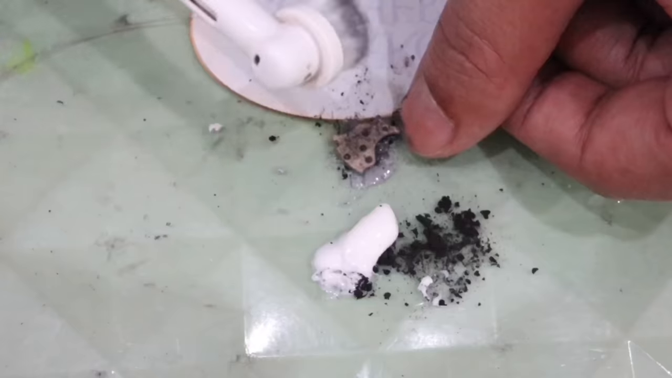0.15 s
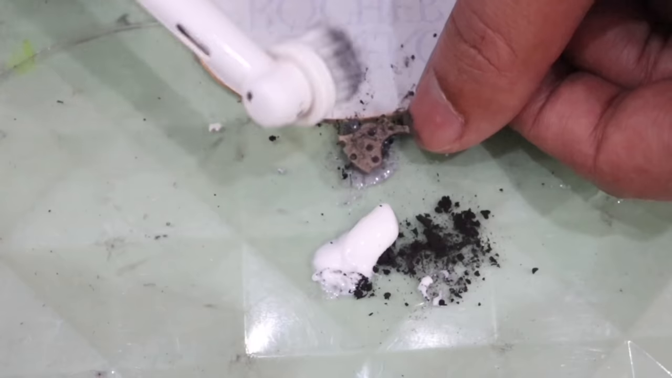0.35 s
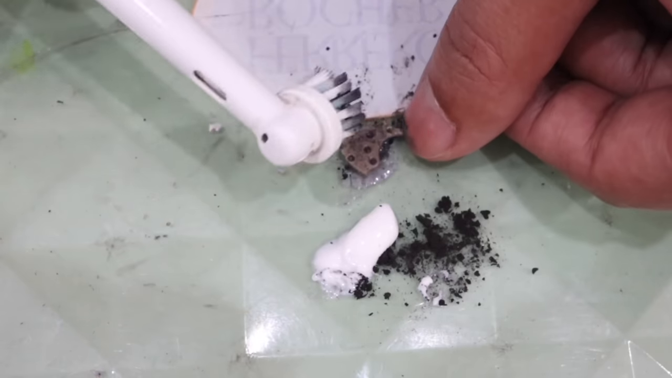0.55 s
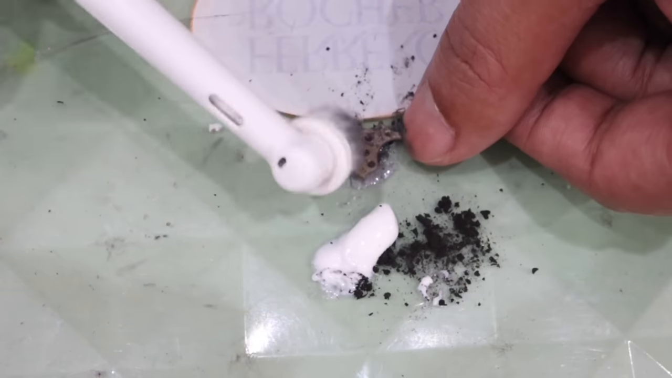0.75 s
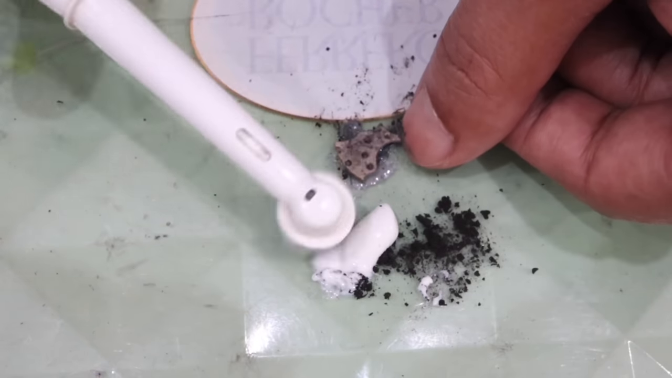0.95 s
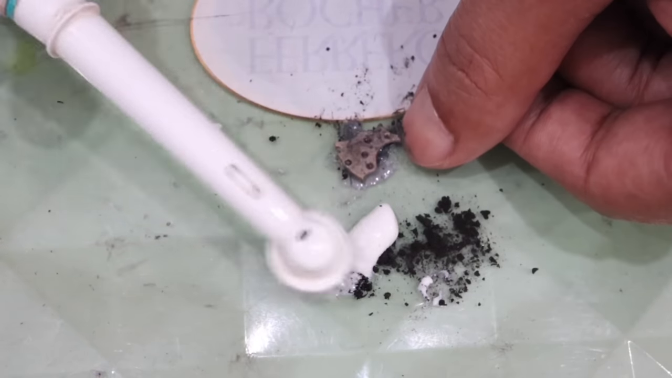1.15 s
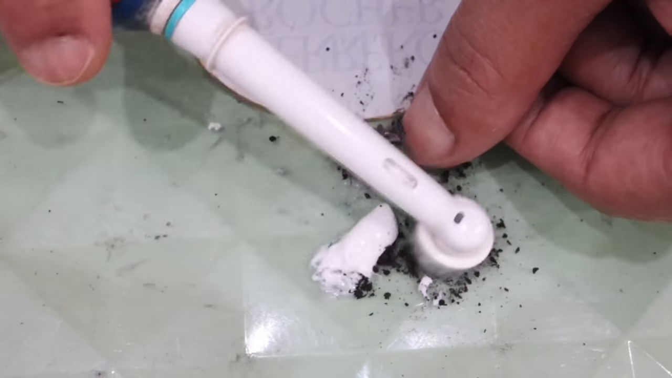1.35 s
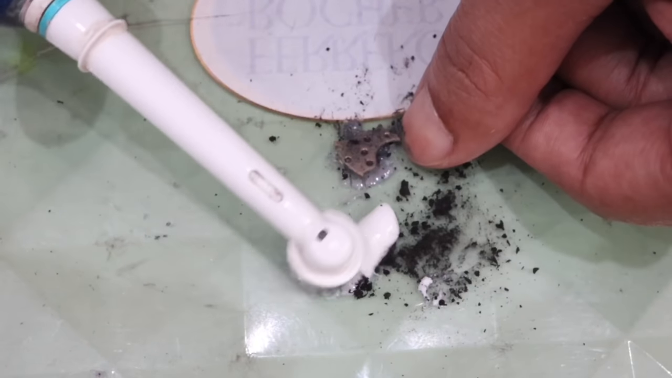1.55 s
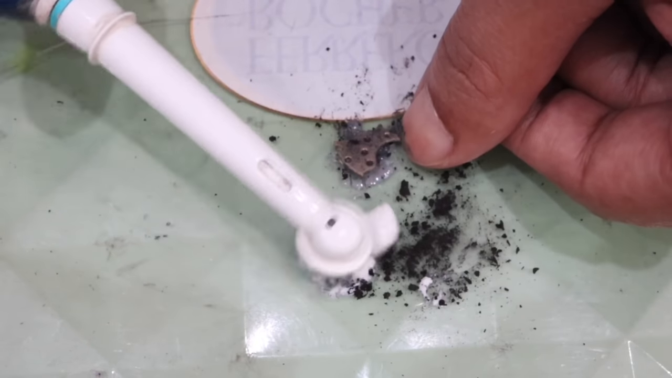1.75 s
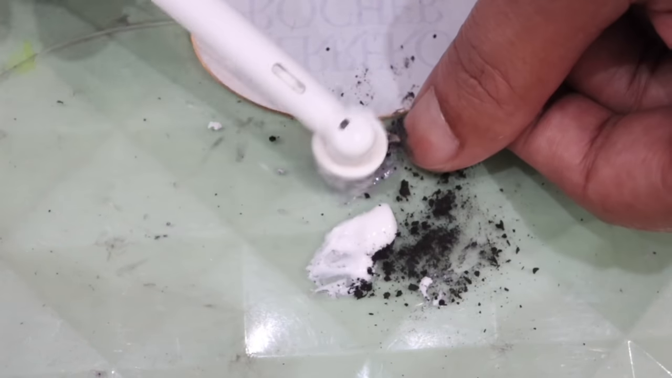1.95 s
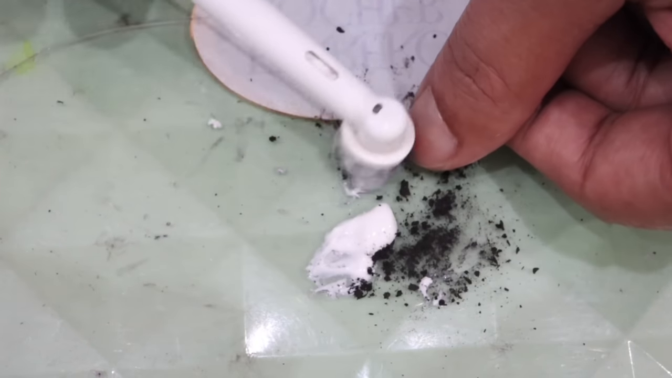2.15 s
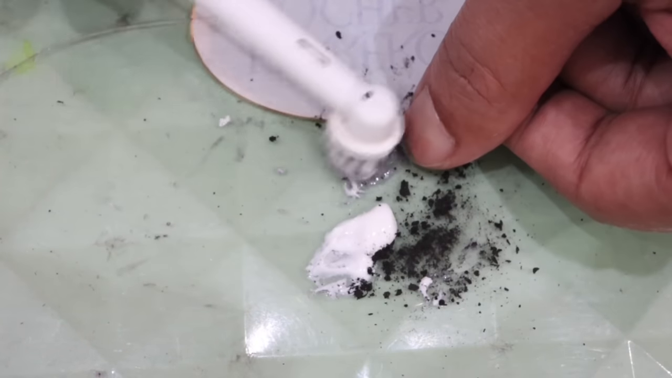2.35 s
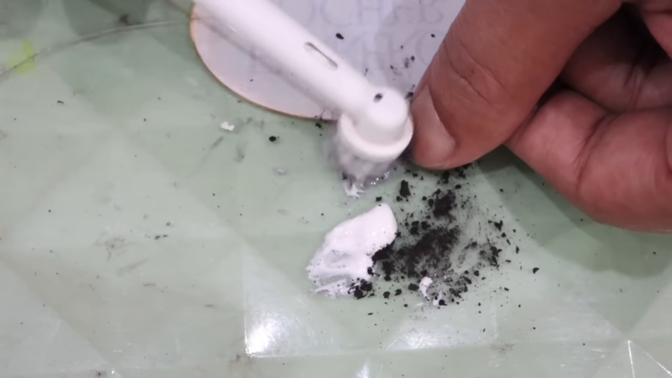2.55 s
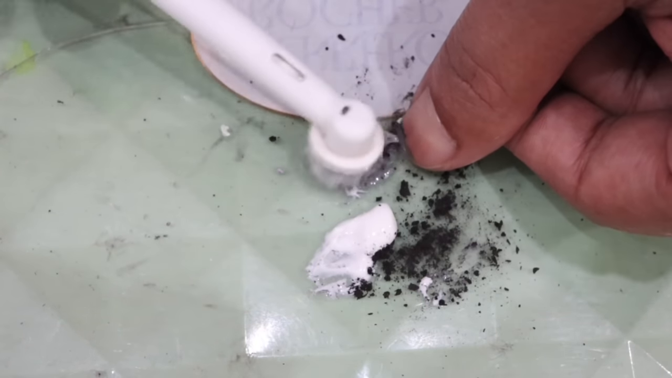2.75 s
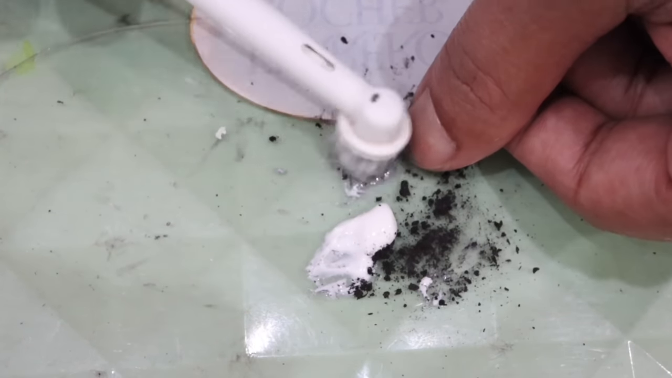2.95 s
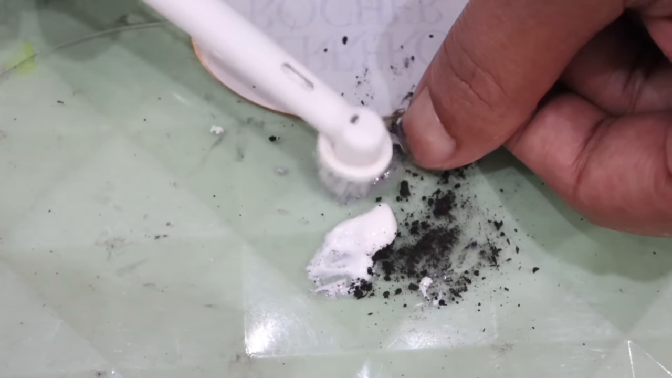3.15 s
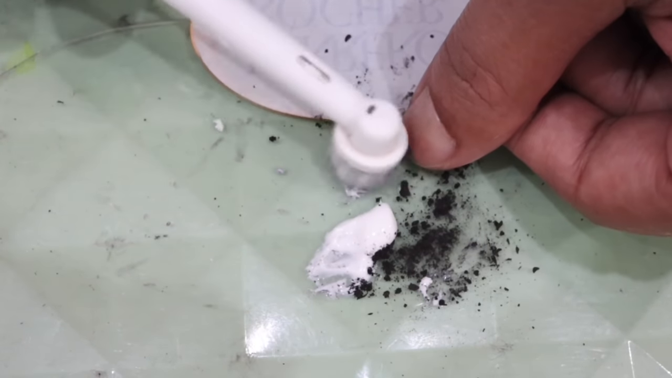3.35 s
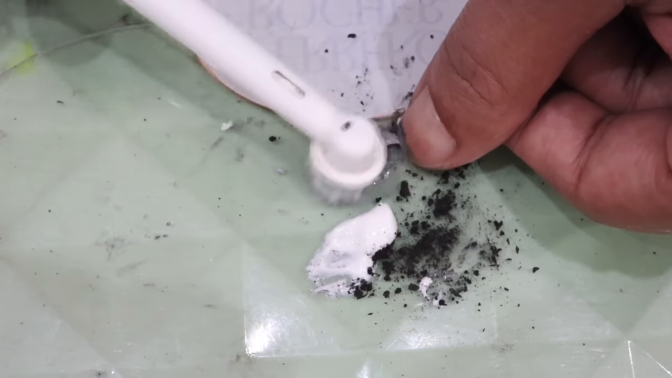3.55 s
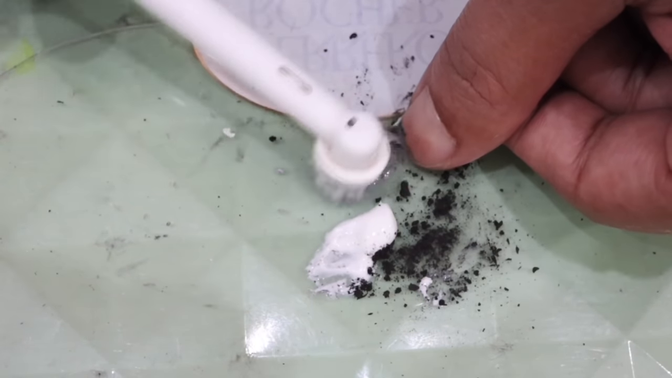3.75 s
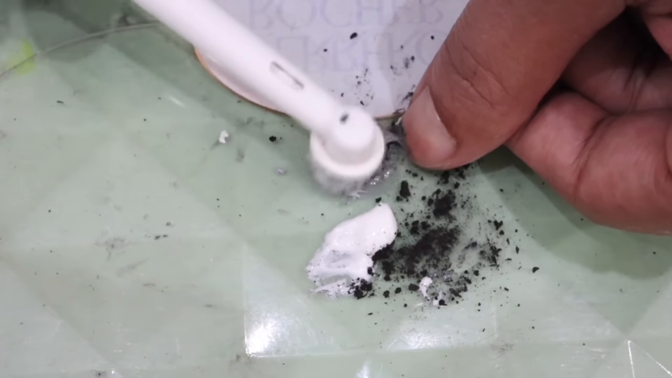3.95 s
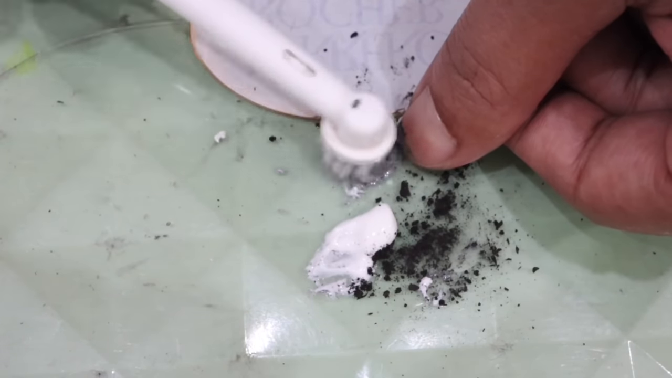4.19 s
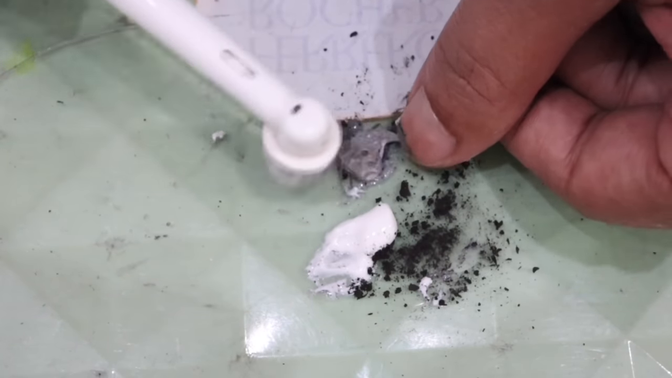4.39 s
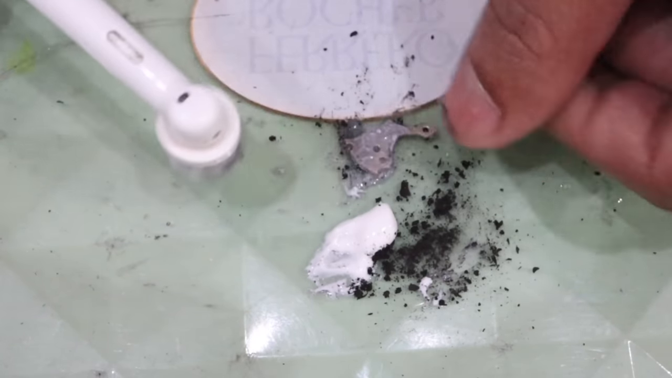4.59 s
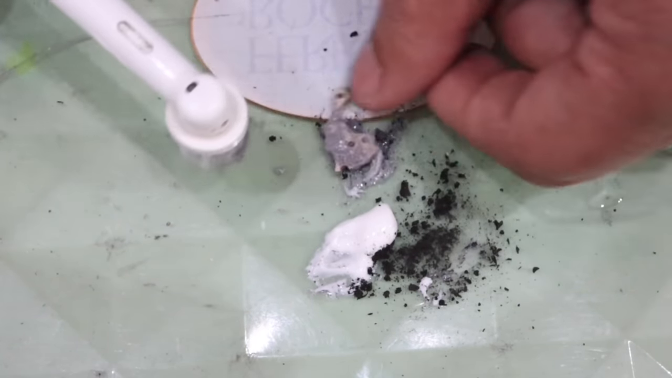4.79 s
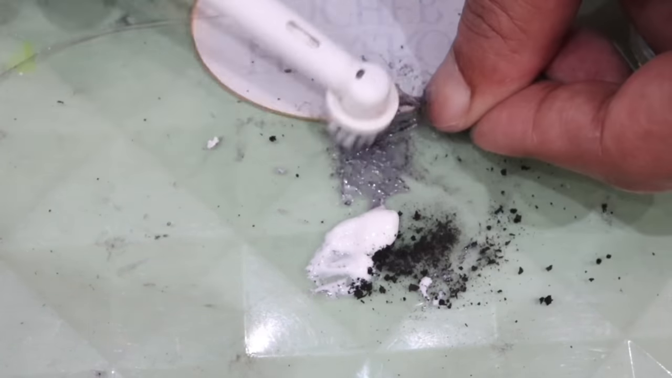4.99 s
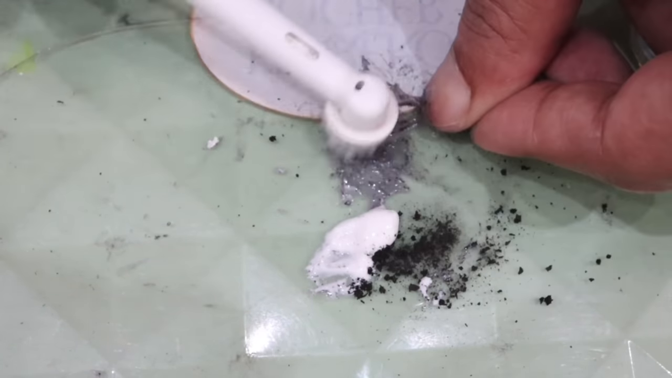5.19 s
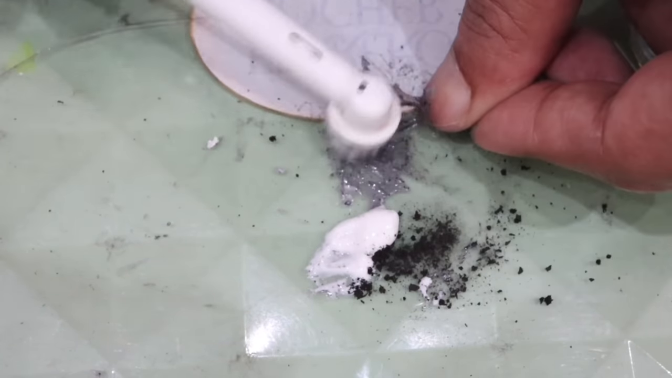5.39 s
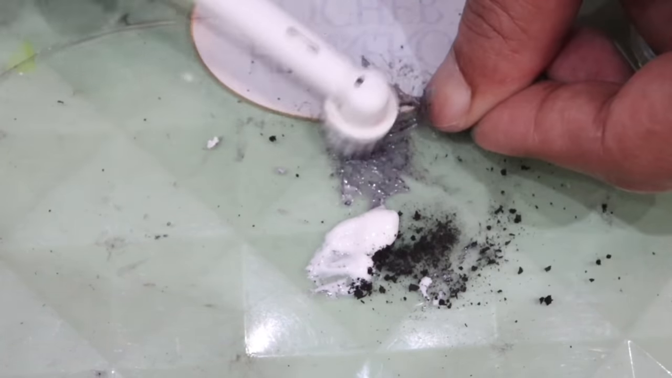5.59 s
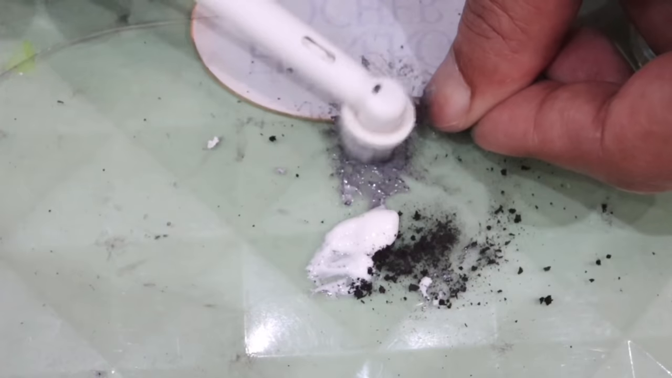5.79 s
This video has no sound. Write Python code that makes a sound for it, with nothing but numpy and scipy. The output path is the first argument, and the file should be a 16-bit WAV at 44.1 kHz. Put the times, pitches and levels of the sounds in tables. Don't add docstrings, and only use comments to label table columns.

```python
import sys
import numpy as np
from scipy import signal
from scipy.io import wavfile
from scipy.ndimage import uniform_filter1d

SR = 44100
rng = np.random.default_rng(int(sys.argv[2]) if len(sys.argv) > 2 else 0)


def persist_wave(psi):
    counts = np.round(np.clip(psi, -1, 1) * 32767).astype(np.int16)
    wavfile.write(sys.argv[1], SR, np.atleast_2d(counts).T)


def gain_from_db(level_db):
    decades = np.asarray(level_db, float) / 20
    return 10 ** decades


N = 257103
T = np.arange(N) / SR
TEETH = 4.537
FREE_WHINE_DB = -71.5

# (start [s], end [s], peak hiss [dB], share of the stroke before its peak [1], spectral
# tilt, high = dull, low = bright [dB])
STROKE_EVENTS = [(0.561, 0.643, -55, 0.7, -3.5), (0.683, 0.766, -55, 0.24, -7),
                 (1.263, 1.284, -55, .1, 5.5), (1.289, 1.367, -60, .1, 3), (2.235, 2.358, -48.5, .4, 0.5),
                 (2.623, 2.69, -50.5, .1, -1.5), (2.691, 2.781, -41.5, 0.56, -14),
                 (2.778, 2.878, -43.5, 0.44, -11.5), (2.881, 2.971, -45.5, 0.38, -8.5),
                 (3.267, 3.339, -41.5, 0.48, -8.5), (3.483, 3.614, -53, 0.77, 1.5),
                 (3.63, 3.765, -52, 0.55, -1), (3.837, 3.96, -55.5, .2, 0.5),
                 (4.557, 4.615, -56, 0.41, -15), (4.654, 4.693, -48, .6, -4),
                 (4.802, 4.86, -49, 0.018, -4.5), (4.904, 5.063, -41.5, 0.046, -7.5),
                 (5.064, 5.097, -42, 0.66, -10), (5.133, 5.213, -44, 0.51, -11.5),
                 (5.254, 5.32, -41.5, 0.39, -5.5), (5.374, 5.412, -41, .3, -10),
                 (5.504, 5.554, -48, 0.064, -9), (5.605, 5.697, -42, .55, -8), (5.735, 5.82, -45, 0.65, -5)]


def evened(x):
    return x / np.sqrt(np.mean(x ** 2) + 1e-20)


def curve(rows, order):
    rows = np.vstack(rows)
    return np.interp(T, rows[:, 0], rows[:, order])


def coloured(x, points):
    f, db = np.transpose(points)
    hz = abs(np.fft.fftfreq(8192, 1 / SR))
    gain_db = np.interp(np.log(hz + 1), np.log(f + 1), db)
    log_gain = np.log(gain_from_db(np.maximum(gain_db, -100)))
    taps = np.fft.ifft(np.exp(np.conj(signal.hilbert(log_gain)))).real[:4096]
    return signal.oaconvolve(x, taps)[:len(x)]


def resonate(x, hz, width):
    pole = np.exp((2j * hz - width) * np.pi / SR)
    return 2 * signal.lfilter([1 - abs(pole)], [1, -pole], x).real


def band(x, low_hz, high_hz):
    return signal.sosfilt(signal.butter(4, [low_hz, high_hz], "band", fs=SR, output="sos"), x)


def wander(hz):
    low_pass = signal.butter(2, hz, fs=SR, output="sos")
    return evened(signal.sosfilt(low_pass, rng.standard_normal(N)))


def grains(per_s, spread_db):
    size = gain_from_db(spread_db * np.minimum(rng.exponential(1, N), 4)) * rng.choice([-1, 1], N)
    return evened(size * (rng.random(N) < per_s / SR))


def lines(table, mesh):
    total = 0
    for m, k, db in table:
        cycles = mesh * (m + k / TEETH) + rng.random()
        total = total + gain_from_db(db) * 2 ** .5 * np.cos(2 * np.pi * cycles)
    return total


def spells(rows, t=T):
    return sum(gain_from_db(db - 9.4 * ((t - s) / half) ** 2) for s, half, db in rows)


def room():
    # (frequency [Hz], density [dB per Hz])
    room_spectrum = [(20, -19), (40, 1), (100, -0.5), (300, -4.5), (450, -29), (600, -37), (1200, -64),
                     (2500, -50)]
    return gain_from_db(-81) * evened(coloured(rng.standard_normal(N), room_spectrum))


def hand_settling():
    start_s, rise_s, hold_s, fall_db_per_s = 0.52, 0.043, 0.075, 200
    shaking = evened(band(rng.standard_normal(N), 17, 120))
    shaking *= np.clip((T - start_s) / rise_s, 0, 1)
    return shaking * gain_from_db(-68.5 - fall_db_per_s * np.maximum(T - start_s - rise_s - hold_s, 0))


def knocks():
    # (time [s], peak level [dB], pitch factor [1], crack level [dB])
    knock_events = [(0.5465, -46, 0.59, -8), (0.6964, -41.5, 0.87, -15), (0.711, -46, 0.77, -5),
                    (0.7279, -44, 0.88, -5), (0.93, -42, 0.84, 5), (1.1544, -43, 0.78, 9),
                    (1.2639, -36, 0.76, 1), (0.6161, -46, 0.31, -6), (2.2384, -35, 0.98, -2),
                    (2.6295, -35.5, 0.98, 2), (2.9614, -34, 0.63, 14), (3.745, -36, 1.1, 4),
                    (4.507, -42, 0.88, 3), (4.6532, -37, 0.9, 4), (4.802, -36.5, 0.9, 17),
                    (4.9062, -31, 0.56, 16), (5.7442, -31, 1, 6)]
    # (time [s], peak level [dB], crack level [dB])
    unit_pitch_knocks = [(1.266, -29, 0), (1.268, -30, 0), (1.295, -29.5, 0), (1.3135, -41, 3), (1.3222, -37, 1),
                         (1.334, -39.5, 0), (1.983, -27.5, 2.5), (2.0432, -27, 3.5)]
    # (frequency [Hz], level [dB], decay time t60 [s])
    plate_modes = [(620, -8, 0.025), (1020, -12, 0.019), (1600, -4, .02), (1900, 0, 0.025), (2960, 3, .015),
                   (3304, 10, 0.03), (4590, 5, 0.028), (5050, 5, 0.036), (5650, 1.5, .02),
                   (6670, 9.5, 0.012), (7540, 3.5, 0.02)]
    # (time [s], peak level [dB], frequency [Hz])
    bump_events = [(5.106, -40, 82)]
    out, t = np.zeros(N + SR), np.arange(SR // 8) / SR
    blows = [*knock_events, *[(s, db, 1, crack_db) for s, db, crack_db in unit_pitch_knocks]]
    for s, db, pitch, crack_db in blows:
        ring = np.zeros(len(t))
        for hz, mode_db, t60 in plate_modes:
            ring += gain_from_db(mode_db - 60 * t / t60) * np.sin(2 * np.pi * (hz * pitch * t + rng.random()))
        crack = band(rng.standard_normal(len(t)), 1870, 15000)
        ring += gain_from_db(crack_db + 10 - 60 * t / 0.028) * crack
        ring *= np.minimum(t / .0004, 1)
        out[round(s * SR):][:len(t)] += gain_from_db(db) * ring / (3.1 * ring[:150].std())
    for s, db, hz in bump_events:
        envelope = t / 0.017 * np.exp(1 - t / 0.0074)
        out[round(s * SR):][:len(t)] += gain_from_db(db) * np.sin(2 * np.pi * hz * t) * envelope
    return out[:N]


def scuffs():
    # (middle [s], half length [s], level [dB], frequency [Hz])
    scuff_events = [(0.598, 0.042, -63, 1000), (.6, .04, -70, 520), (.62, 0.028, -70, 219),
                    (0.71, 0.028, -66, 1025), (2.275, 0.041, -70, 336), (2.275, .025, -63, 780),
                    (.69, .07, -70, 140), (.7, .03, -72, 60), (0.57, .025, -64, 45),
                    (3.58, 0.016, -58, 2400), (3.556, .02, -56, 3460), (2.73, 0.036, -56, 4200),
                    (2.75, .05, -54, 6300), (1.3, .015, -66, 580), (1.31, .02, -60, 1800),
                    (2.76, .07, -56, 10800), (2.29, 0.028, -52, 3560), (2.327, 0.022, -54.5, 2370),
                    (2.34, .03, -61, 1500), (2.645, 0.02, -66, 850), (4.937, 0.032, -58, 1800),
                    (2.743, 0.051, -49.5, 4760), (2.846, 0.035, -51, 4600), (3.52, 0.045, -55, 2380),
                    (3.51, .03, -58, 3000), (3.57, .03, -57, 3050), (3.565, .03, -58, 3850),
                    (3.68, .04, -62, 1850), (3.715, 0.055, -54, 3330), (3.69, .07, -58, 3750),
                    (5.39, .025, -52, 5000), (5.28, .035, -54, 5000), (4.97, .06, -51, 7200),
                    (5.0, .06, -55, 9950), (3.915, .045, -56.5, 2600), (5.525, 0.03, -53, 4950),
                    (2.27, .03, -56, 4900)]
    rub = rng.standard_normal(N) + 0.48 * grains(300, 2.6)
    out = np.zeros(N)
    for s, half, db, hz in scuff_events:
        near = slice(round((s - 3 * half) * SR), round((s + 3 * half) * SR))
        width = 0.15 * hz
        ring = resonate(resonate(rub[near], hz, width), hz, width)
        out[near] += evened(ring) * spells([(s, half, db)], T[near])
    return out


def gear_mesh():
    # (time [s], frequency [Hz])
    mesh_speed = [(.5, 684.3), (2.22, 684.3), (2.3, 687), (2.42, 684.5), (2.6, 684.5), (2.66, 689.6),
                  (3.0, 695), (3.2, 691), (3.58, 683), (3.75, 686), (3.92, 682), (4.22, 689.9),
                  (4.45, 688.3), (4.87, 691), (4.95, 687), (5.07, 689.8), (5.33, 685), (5.83, 688.4)]
    return np.cumsum(curve(mesh_speed, order=1)) / SR


def pressure():
    # (start [s], end [s], first whine [dB], last whine [dB], table rumble [dB])
    touch_events = [(0.534, 0.628, -72, -56.5, -70), (0.616, 0.743, -65, -67.5, -67),
                    (2.235, 2.349, -52.5, -50.5, -69.5), (2.618, 2.997, -60, -52.5, -68),
                    (3.021, 3.15, -53.5, -60, -79), (3.152, 3.268, -60, -51.5, -73.5),
                    (3.26, 3.347, -53.5, -57.5, -70), (3.494, 3.673, -55, -58.5, -74.5),
                    (3.685, 3.76, -86, -62, -66.5), (3.761, 3.83, -78, -74, -80),
                    (3.836, 3.939, -56.5, -52, -73), (3.965, 4.05, -74, -77, -80),
                    (4.047, 4.638, -54, -50.5, -71), (4.625, 4.914, -51, -50.5, -69.5),
                    (4.916, 5.038, -45.5, -49, -65.5), (5.038, 5.167, -47.5, -46, -67),
                    (5.17, 5.347, -46.5, -52.5, -66.5), (5.343, 5.835, -48, -48, -65.5)]
    free_rumble_db, land_s, lift_s = -84, 0.015, 0.064
    levels = np.array([FREE_WHINE_DB + 0 * T, free_rumble_db + 0 * T])
    for start, end, first_db, last_db, rumble_db in touch_events:
        contact = np.clip(np.minimum((T - start) / land_s, 1 + (end - T) / lift_s), 0, 1)
        held = np.array([np.interp(T, [start, end], [first_db, last_db]), rumble_db + 0 * T])
        levels = levels + contact * (held - levels)
    return levels


def sliding():
    under_way = sum(1. * (T >= row[0]) * (T < row[1]) for row in STROKE_EVENTS)
    return uniform_filter1d(under_way, size=1300)


def table_rumble(rumble_db):
    # (frequency [Hz], density [dB per Hz])
    rumble_spectrum = [(40, -57), (150, -10), (225, -21.5), (300, -15.5), (390, -18.5), (450, -13),
                       (600, -13), (780, -32.5), (1000, -25), (1500, -18.5), (2500, -82)]
    shake = coloured(rng.standard_normal(N), rumble_spectrum)
    return shake * gain_from_db(rumble_db - 2 * sliding() - 1.5) / np.std(band(shake, 110, 500))


def rattle(mesh, whine_db):
    # (frequency [Hz], density [dB per Hz])
    housing_spectrum = [(500, -63), (950, -19), (1500, -17), (1900, -10), (2450, -4), (3250, -5.5),
                        (4200, -6), (4950, -2), (5600, -6), (6900, -9.5), (7800, -9), (9200, -8.5),
                        (10300, -7.5), (15800, -2.5)]
    # (time [s], rattle level [dB])
    nearness = [
        (.53, -70),
        (.65, -60),
        (3.1, -58.5),
        (4.3, -60.5),
        (4.9, -59.5),
        (5.4, -54.5),
        (5.83, -57),
    ]
    # (middle [s], half length [s], level [dB])
    chatter_spells = [
        (.675, .02, -53),
        (.745, .03, -54),
        (.85, 0.12, -57.5),
        (2.15, 0.29, -60),
        (3.38, .06, -58),
        (3.56, 0.099, -59.5),
        (4.05, 0.13, -61),
    ]
    shaft = mesh / TEETH
    angle = 2 * np.pi * shaft
    weight = np.exp(1.1 * np.cos(angle))
    every_second_tooth = np.diff(np.floor(mesh / 2), prepend=0)
    teeth = evened(every_second_tooth * (weight - weight.mean()))
    throb = gain_from_db(0.82 * np.cos(angle) + 0.42 * np.cos(2 * angle) + 0.5 * wander(60))
    hiss = evened(rng.standard_normal(N) + 0.31 * grains(2100, 6.6)) * throb
    body = coloured(evened(hiss) + 0.39 * teeth, housing_spectrum)
    body /= np.std(band(body, 10000, 15000))

    cycles = (mesh - mesh[round(1.522 * SR)]) / 50
    blows = np.zeros(N)
    for late, size in [(0, 1), (.36, .5)]:
        blows += size * (np.diff(np.floor(cycles - late), prepend=0) == 1)
    ticks = evened(band(blows * gain_from_db(2.5 * wander(15)), 10500, 15000))

    slaps = evened(np.diff(np.floor(shaft), prepend=0) * gain_from_db(3.5 * rng.standard_normal(N)))
    loose = .6 * grains(1000, 3) * throb
    loose += 1.1 * slaps * gain_from_db(3 * wander(12))
    loose += 14 * blows + .7 * rng.standard_normal(N)
    chatter = evened(resonate(resonate(evened(loose), 13200, 1400), 13200, 1400))

    ringing = gain_from_db(whine_db - 13) * evened(resonate(resonate(hiss, 5040, 730), 5040, 730))
    rattling = gain_from_db(curve(nearness, order=1)) * (body + gain_from_db(-8.5) * ticks)
    return rattling + spells(chatter_spells) * chatter + ringing


def swells(mesh, whine_db):
    # (middle [s], half length [s], level [dB], mesh multiple [1], shaft multiple [1])
    swell_events = [(2.265, 0.034, -63.5, 1, 1), (2.3, 0.04, -60, 2, 0), (2.255, 0.042, -67, .5, 0),
                    (2.29, 0.056, -71, 0, 2), (2.335, .02, -62, 1, 2), (2.3, .05, -68, 1.5, 0),
                    (2.33, .06, -73.5, 0, 1), (4.32, 0.054, -74, 1, 1), (4.46, 0.043, -71, 1, 1),
                    (4.94, .04, -61.5, 2, 0), (4.95, .05, -66, 1.5, 0), (5.14, 0.034, -68, 1, 1),
                    (3.9, .05, -65.5, 2, 0), (2.85, .12, -68, 2, 0)]
    out = np.zeros(N)
    for s, half, db, m, k in swell_events:
        near = slice(round((s - 3 * half) * SR), round((s + 3 * half) * SR))
        out[near] += spells([(s, half, db)], T[near]) * lines([(m, k, 0)], mesh[near])
    touching = np.clip((whine_db - FREE_WHINE_DB) / 10, 0, 1)
    return out * gain_from_db(1.5 * wander(30)) * touching


def whine(mesh, whine_db):
    # (mesh multiple [1], shaft multiple [1], level [dB])
    air_lines = [(0, 2, -90), (0, 3, -92), (1, -1, -85), (1, 1, -89), (1, 2, -94), (1, 3, -88), (1, 4, -81),
                 (1, 5, -88), (2, -1, -90), (2, 0, -82), (2, 2, -83), (2, 3, -84), (2, 4, -85),
                 (0, 10, -83), (2.5, 0, -83), (3, 0, -82), (3.5, 0, -79), (3.5, 1, -80), (3.5, 2, -81),
                 (3.5, 3, -82)]
    # (mesh multiple [1], shaft multiple [1], level re whine [dB])
    plate_lines = [(0, 1, -24), (0, 2, -27), (.5, 0, -22), (0, 3, -28), (0, 4, -22), (1, 1, -25),
                   (1, 2, -23), (1.5, 0, -25), (2, 0, -21), (3, 0, -23)]
    tone = 2 ** .5 * np.cos(2 * np.pi * mesh + 0.11 * wander(70)) * gain_from_db(0.95 * wander(50))
    partners = gain_from_db(-3 + 2.2 * wander(25)) * lines(plate_lines, mesh)
    pressed = gain_from_db(whine_db) * (tone + partners)
    return pressed + swells(mesh, whine_db) + lines(air_lines, mesh)


def scrub(mesh, whine_db):
    # (frequency [Hz], density [dB per Hz])
    grit_spectrum = [(700, -27.5), (1000, -20), (1500, -22), (1900, -13.5), (3240, -9), (7290, -14),
                     (11500, -14.5), (14000, -14.5), (15800, -20)]
    # (frequency [Hz], width [Hz], level [dB])
    part_modes = [(859, 25, 0.5), (997, 4.2, 8.5), (1860, 40, 0.5), (2564, 55, 2), (3280, 50, 1.5),
                  (3790, 61, -4), (4780, 67, -5), (6620, 67, 4), (7230, 140, 5.5), (10000, 150, 3),
                  (4170, 70, -3.5), (6220, 65, -0.5), (15000, 450, -3)]
    # (time [s], hiss level [dB])
    hop_events = [(4.5588, -46), (4.5648, -45), (4.5722, -45), (4.58, -45), (4.5853, -43), (4.5925, -42),
                  (4.605, -44.5), (5.5053, -40.5), (5.5122, -39.5), (5.5182, -45), (5.5255, -42),
                  (5.5318, -45), (5.5385, -43), (5.545, -44), (2.638, -49), (3.2006, -49), (3.227, -52),
                  (4.4008, -53), (2.2466, -50), (2.2874, -49), (5.2598, -43.5)]
    slips = rng.standard_normal(N) + 0.65 * grains(2500, 1.33) + 0.27 * grains(350, 2.7)
    slips = evened(slips) * gain_from_db(2 * wander(160) + 0.28 * np.cos(2 * np.pi * mesh / TEETH))
    rings = sum(gain_from_db(db) * resonate(slips, hz, width) for hz, width, db in part_modes)
    grit = coloured(slips + rings, grit_spectrum)

    edges_hz = [(3900, 9000), (750, 1900), (1900, 3900), (9000, 16500)]
    gains = np.zeros((len(edges_hz), N))
    for start, end, db, share, dull_db in STROKE_EVENTS:
        inside = (T >= start) & (T < end)
        colour_db = np.array([[0], [-11 + 0.46 * dull_db], [dull_db], [-7 - 0.31 * dull_db]])
        top = start + np.clip(share, 0, 1) * (end - start)
        swell_db = np.interp(T[inside], [start, top, end], [-6.5, 0, -5.5])
        gains[:, inside] += gain_from_db(db + swell_db + colour_db)
    hop_t60_s = 0.019
    for s, db in hop_events:
        after = (T >= s) & (T < s + .05)
        colour_db = np.array([[0], [-20], [-4], [-5]])
        gains[:, after] += gain_from_db(db - 60 * (T[after] - s) / hop_t60_s + colour_db)

    resting_db = whine_db + np.array([[-8], [-14], [-9], [-20]])
    gains = np.hypot(uniform_filter1d(gains, size=40), gain_from_db(resting_db))
    return sum(gain * evened(band(band(grit, *edge), *edge)) for gain, edge in zip(gains, edges_hz))


def ports(mid):
    # (frequency [Hz], side re mid level [dB])
    port_difference = [(40, -54), (70, -42), (130, -27), (350, -15), (690, -24.5), (1290, -17.5),
                       (2380, -10), (4400, -2), (8120, 3), (15000, -2)]
    t = np.arange(SR // 8) / SR
    tails = rng.standard_normal((3, len(t))) * gain_from_db(-60 * t / 0.055)
    turn = 2 * np.pi * (2.7 * T + 0.13 * wander(1.33) + np.arange(3)[:, None] / 3)
    fed = mid * np.cos(turn) * np.sqrt(2 / 3)
    side = signal.oaconvolve(fed, tails / np.linalg.norm(tails[0]), axes=1)[:, :N].sum(0)
    side = coloured(side, port_difference)
    side += 0.22 * band(mid, 5300, 17700)
    return np.array([mid + side, mid - side])


def scene():
    mesh = gear_mesh()
    whine_db, rumble_db = pressure()
    mid = room() + hand_settling() + knocks() + scuffs() + table_rumble(rumble_db)
    mid += rattle(mesh, whine_db) + whine(mesh, whine_db) + scrub(mesh, whine_db)
    return ports(mid)


def roll_off(x):
    return signal.sosfilt(signal.butter(12, 16510, fs=SR, output="sos"), x)


def record(dry):
    start_s, fade_s, edge_hz = 0.524, 0.023, 15760
    fade = np.clip((T - start_s) / fade_s, 0, 1) ** 2
    low_pass = signal.firwin(511, edge_hz, window=("kaiser", 9), fs=SR)
    limited = signal.oaconvolve(dry * fade, low_pass[None], "same")
    return roll_off(limited)


dry = scene()
out = record(dry)
persist_wave(out)
```